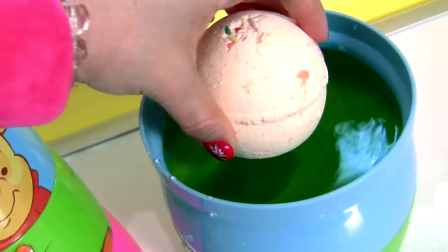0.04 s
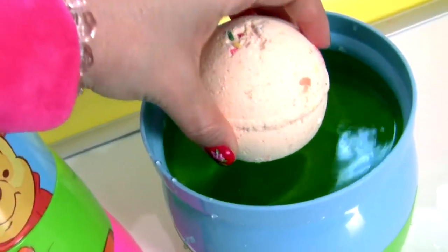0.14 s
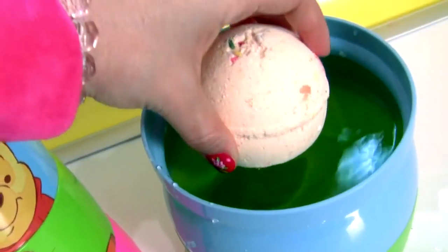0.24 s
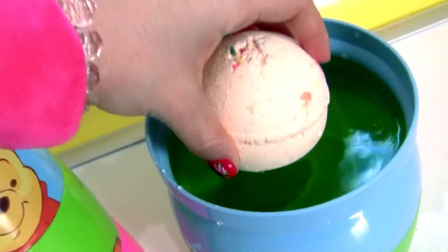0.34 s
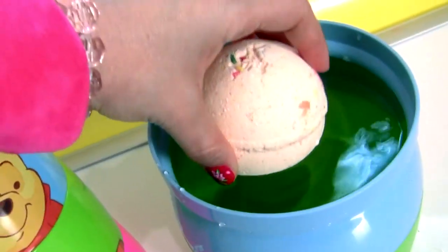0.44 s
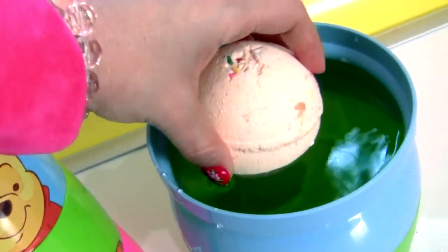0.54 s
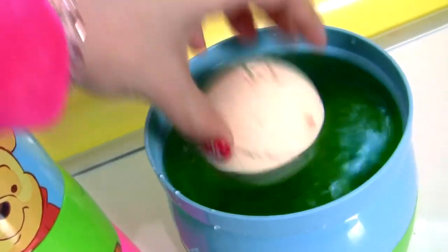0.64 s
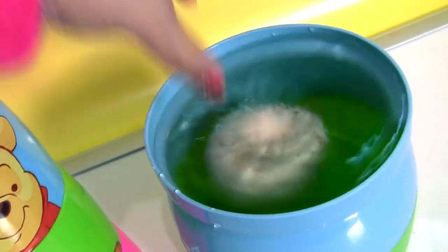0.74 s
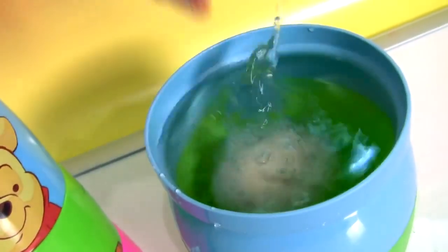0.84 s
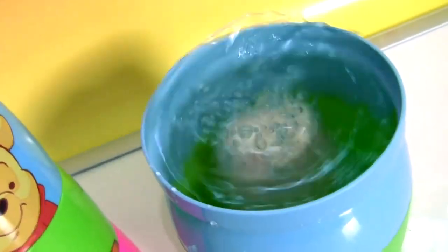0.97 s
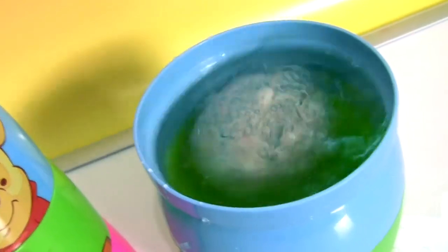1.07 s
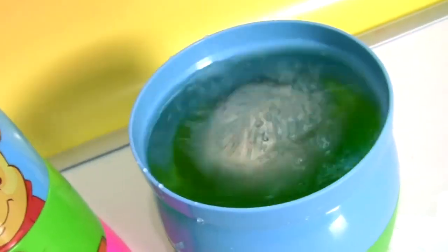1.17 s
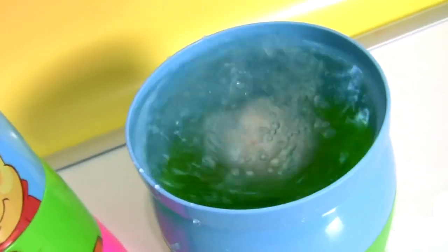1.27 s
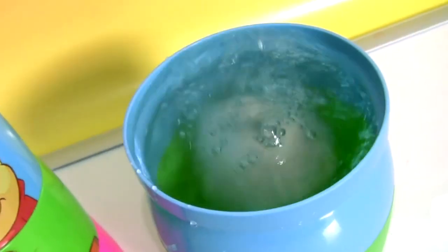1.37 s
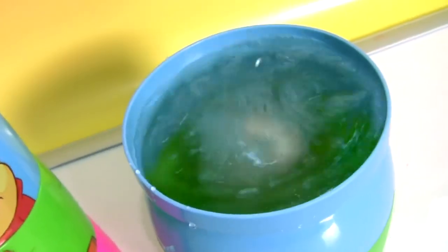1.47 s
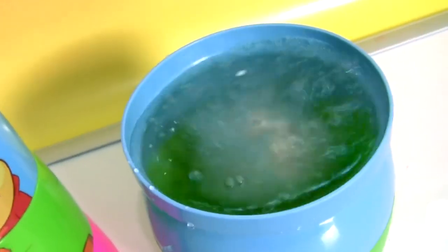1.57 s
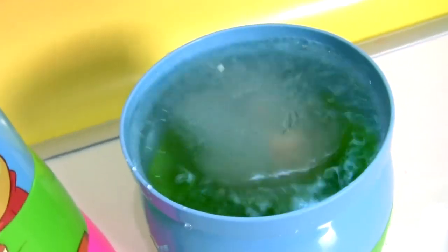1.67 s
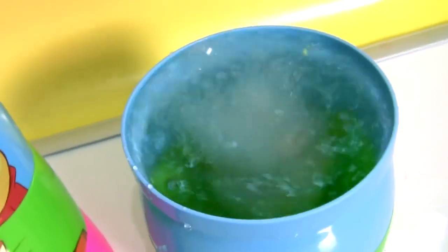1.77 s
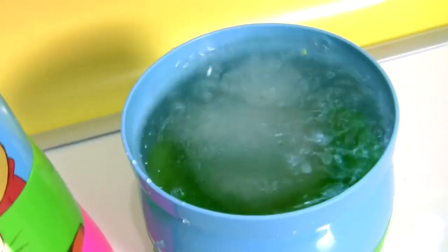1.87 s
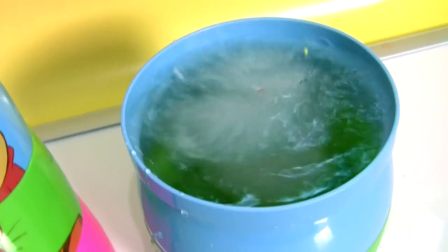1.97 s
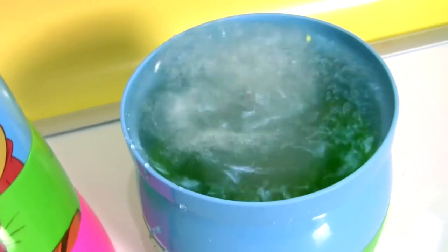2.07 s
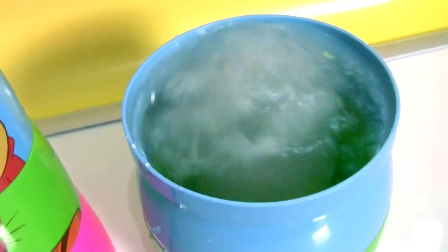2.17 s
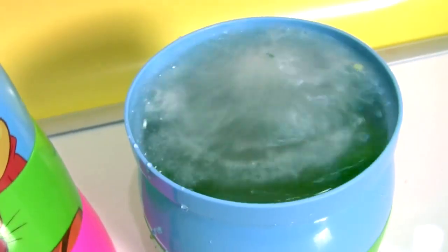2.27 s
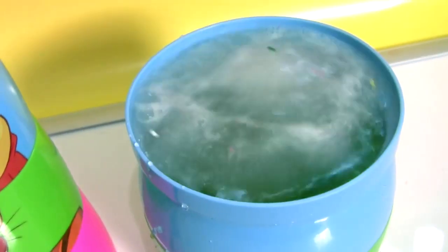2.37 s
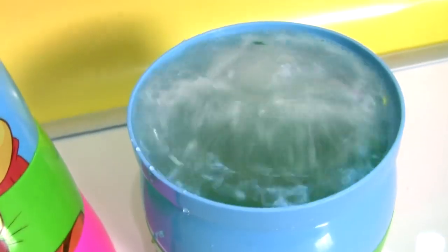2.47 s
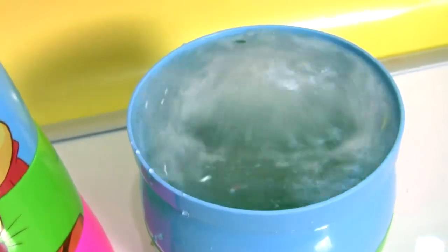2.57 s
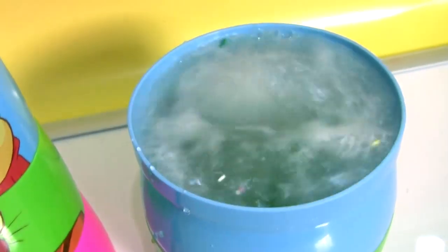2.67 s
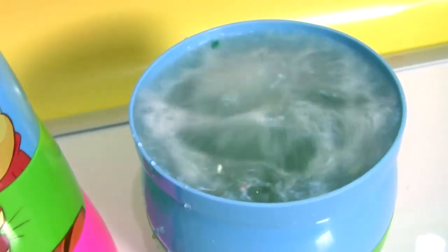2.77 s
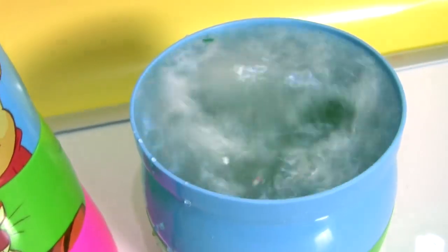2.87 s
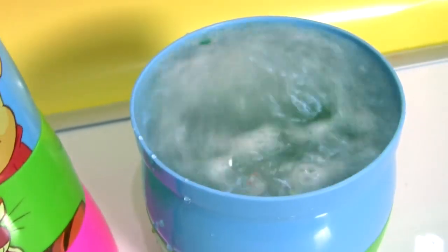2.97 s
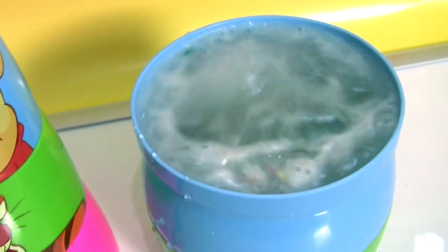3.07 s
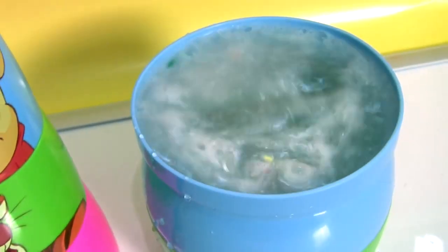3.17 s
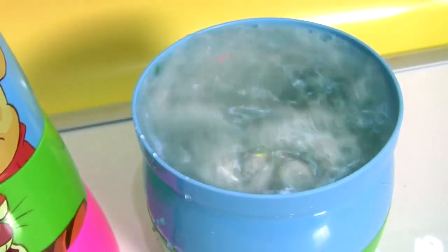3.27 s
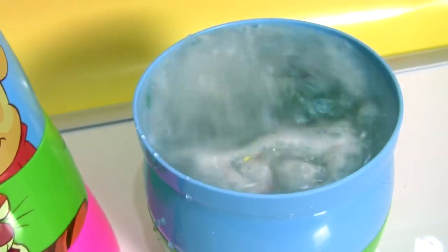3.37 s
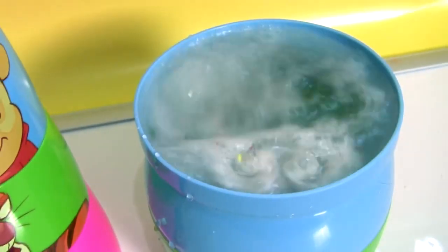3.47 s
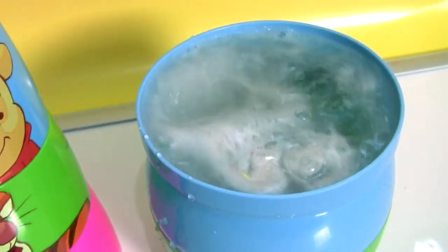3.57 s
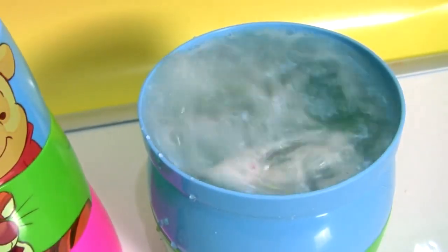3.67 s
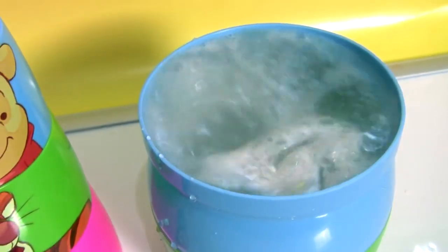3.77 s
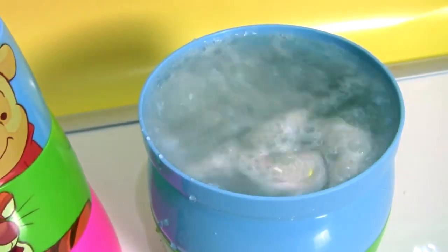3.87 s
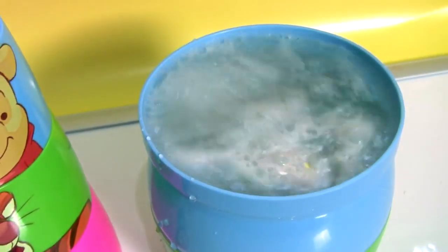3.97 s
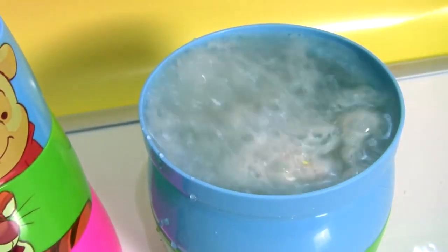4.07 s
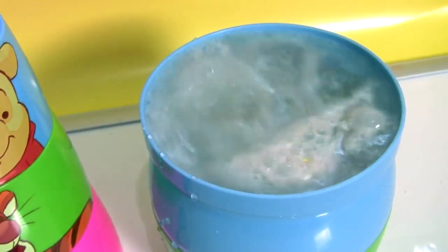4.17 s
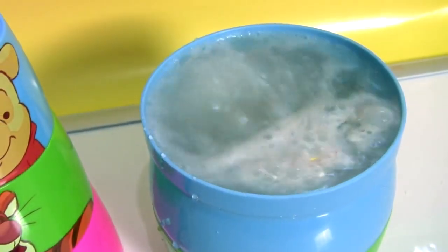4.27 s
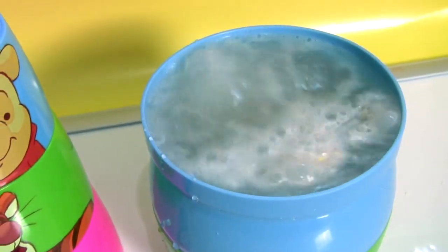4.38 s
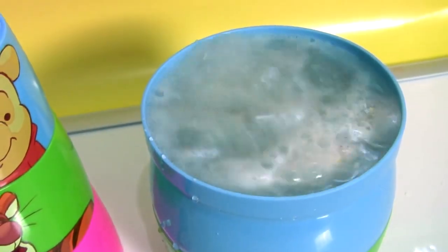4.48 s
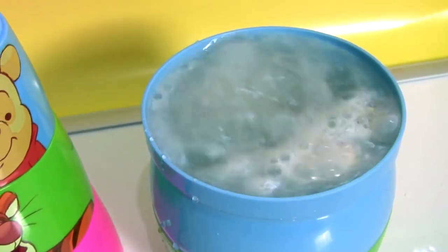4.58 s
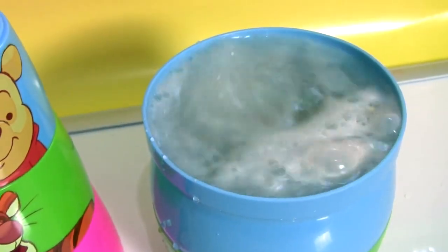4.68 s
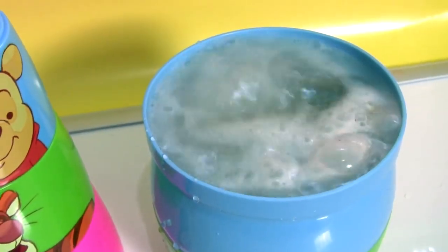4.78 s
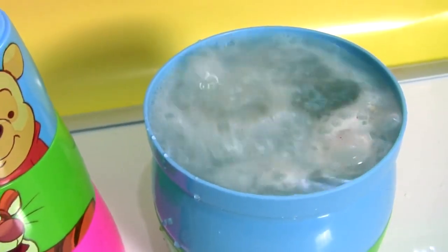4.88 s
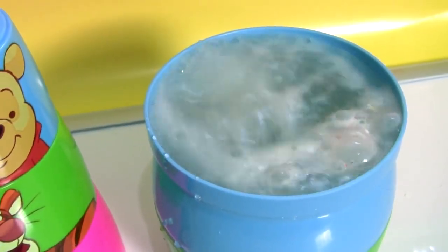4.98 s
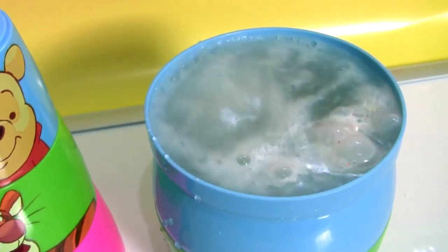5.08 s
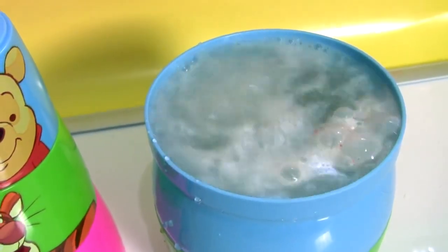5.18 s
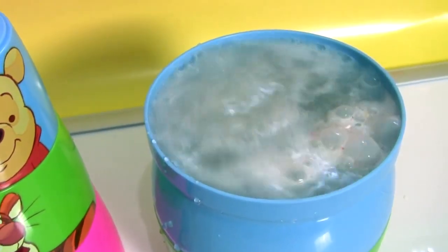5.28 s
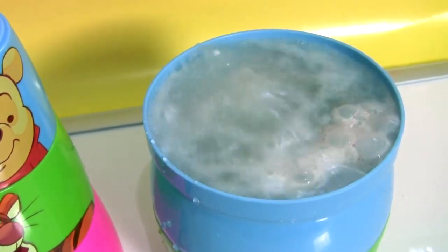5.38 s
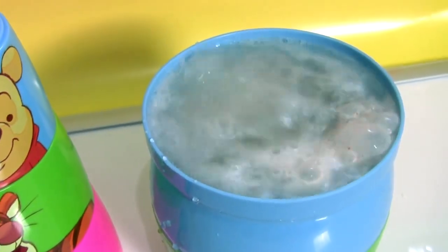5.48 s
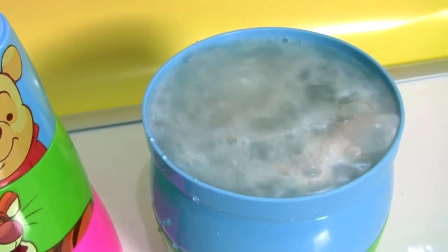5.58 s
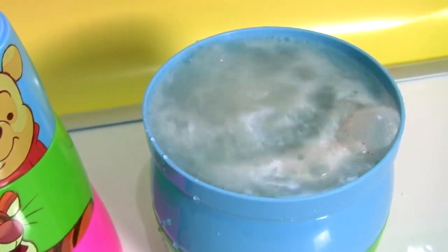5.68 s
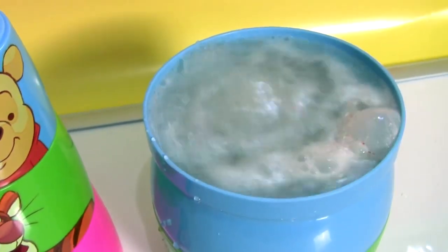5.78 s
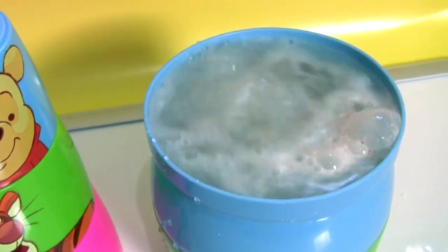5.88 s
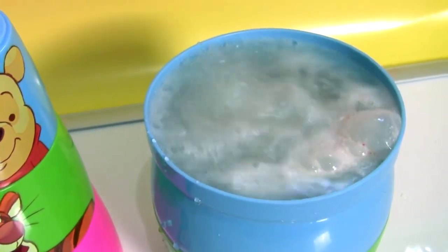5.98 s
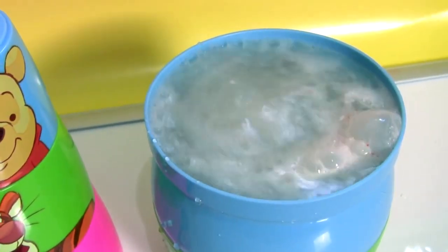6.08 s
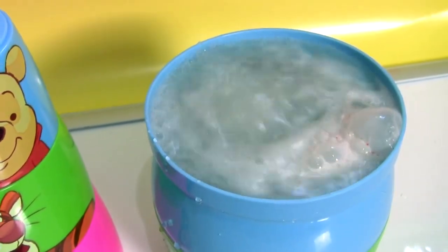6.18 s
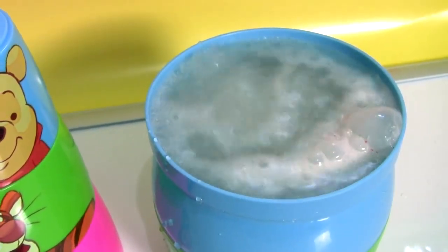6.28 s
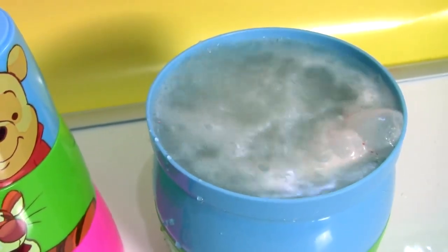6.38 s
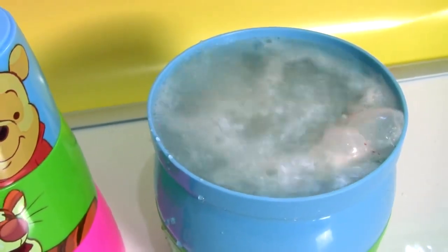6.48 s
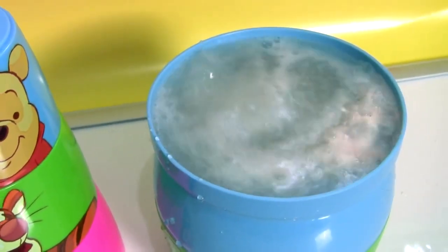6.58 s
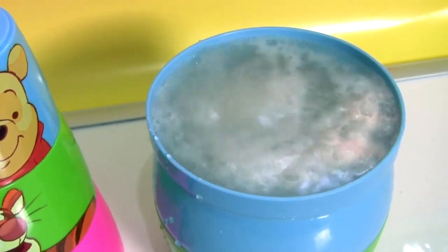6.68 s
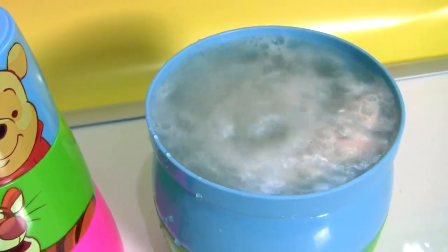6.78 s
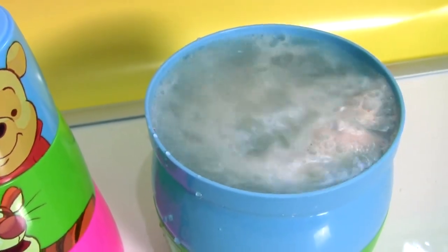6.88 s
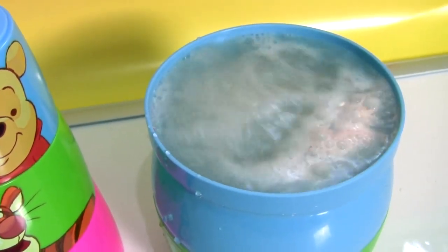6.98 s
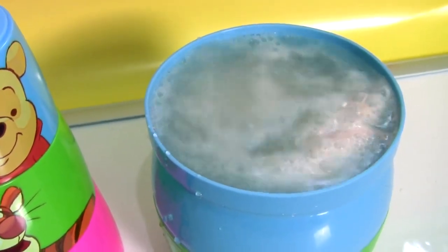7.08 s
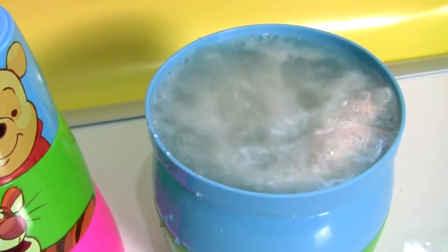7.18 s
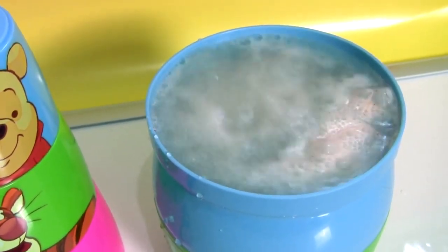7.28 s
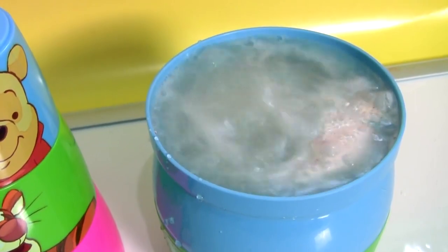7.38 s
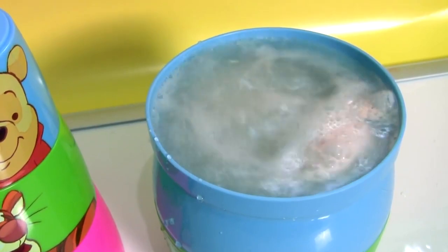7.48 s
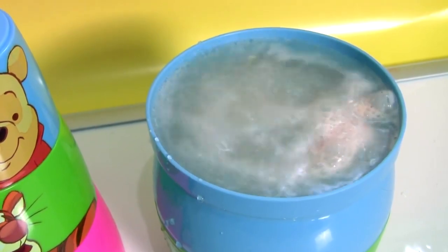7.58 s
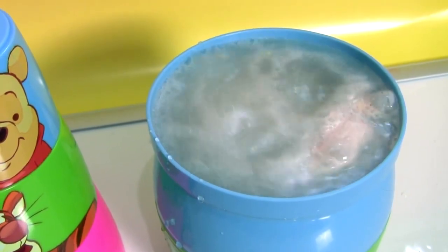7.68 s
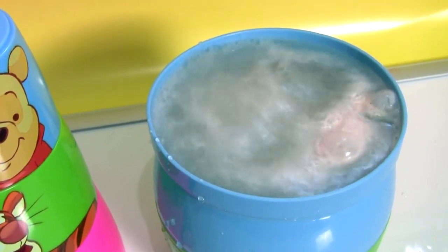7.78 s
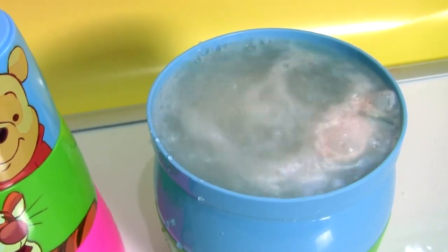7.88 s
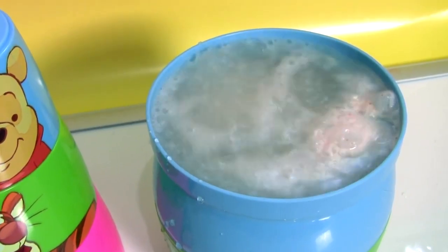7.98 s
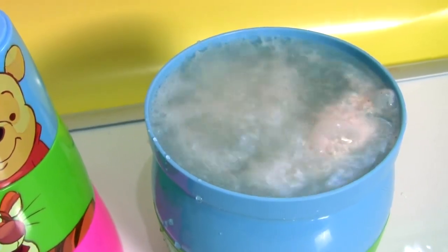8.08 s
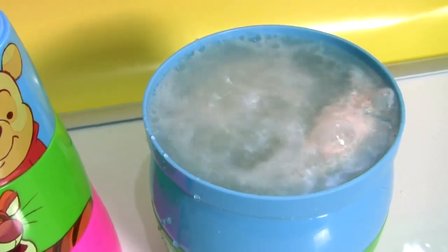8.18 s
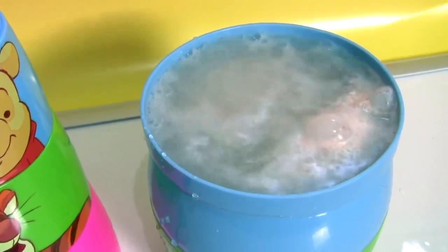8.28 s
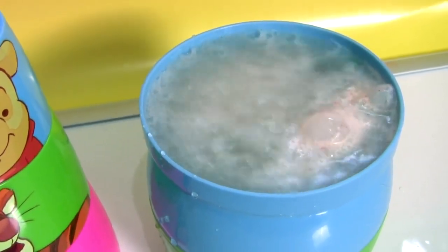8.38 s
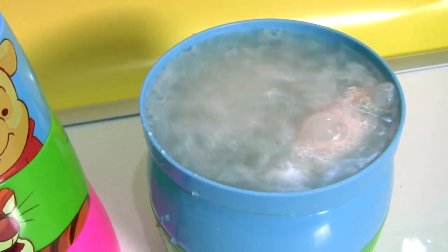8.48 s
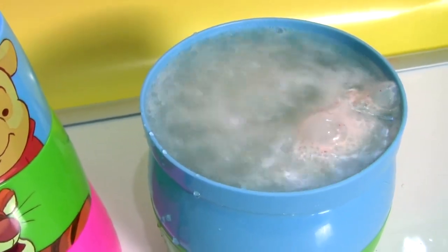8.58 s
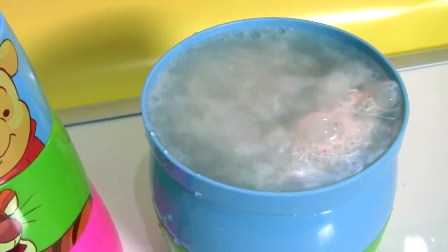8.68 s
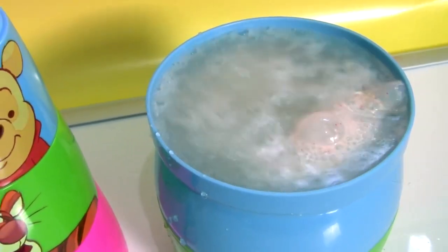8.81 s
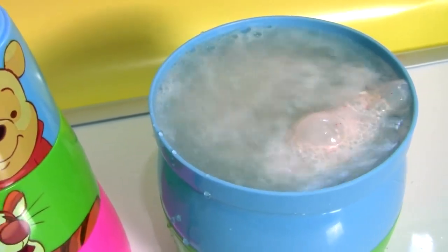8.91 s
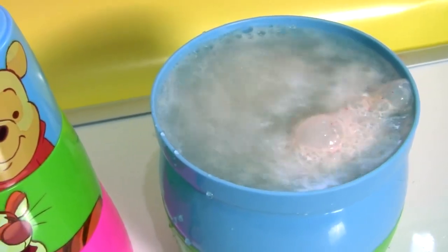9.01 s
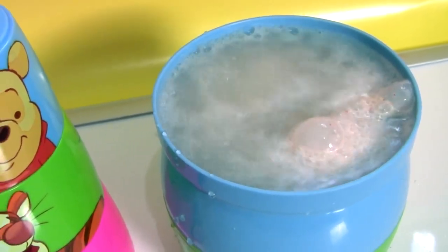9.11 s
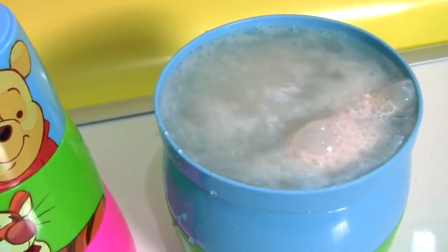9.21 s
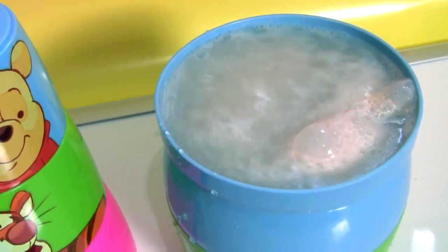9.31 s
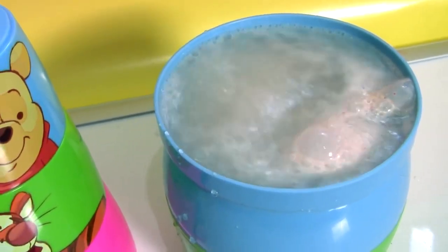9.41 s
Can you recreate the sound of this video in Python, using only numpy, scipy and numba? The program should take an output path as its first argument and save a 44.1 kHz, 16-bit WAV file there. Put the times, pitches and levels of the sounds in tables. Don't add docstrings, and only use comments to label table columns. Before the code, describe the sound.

A bath bomb is dropped into a plastic cup of water at arm's length in a small room with a droning fan. The splash and hard plastic thunk come almost together, followed by bubbling gurgles, crisp spray ticks and a couple of weak bumps. Within about two seconds the crackling thickens into an even, sizzling hiss, slightly right of centre, dotted with plops.

```python
import sys
import numpy as np
from scipy import signal
from scipy.fft import rfft, irfft, next_fast_len
from scipy.io import wavfile
from scipy.ndimage import uniform_filter1d, map_coordinates
from numba import njit

SR = 44100
rng = np.random.default_rng(int(sys.argv[2]) if len(sys.argv) > 2 else 0)


def linear_from_db(decibels):
    return 10 ** (np.asarray(decibels, float) / 20)


def materialize(psi):
    bounded = np.clip(np.atleast_2d(psi).T, -1, 1)
    quanta = np.round(bounded * 32767).astype(np.int16)
    wavfile.write(sys.argv[1], SR, quanta)


N = 416744
OPPOSITE = np.array([[1], [-1]])


def level(x, db):
    return x * linear_from_db(db) / np.sqrt(np.mean(x ** 2))


def curve(table, hold=False):
    s, db = np.transpose(table)
    return np.interp(np.arange(N) / SR, s, db, -120, db[-1] if hold else -120)


def colour(x, points, modes=(), lift_db=0.):
    size = next_fast_len(N)
    hz = np.arange(1, size // 2 + 2) * SR / size
    f, db = np.transpose(points)
    gain = linear_from_db(np.interp(np.log(hz), np.log(f), db))
    for centre, width, top_db in modes:
        gain = gain * (1 + linear_from_db(top_db + lift_db) / (1 + (2 * (hz - centre) / width) ** 2))
    return irfft(rfft(x, size) * gain, size)[..., :N]


def walk(rate):
    k = int(SR / rate)
    steps = np.repeat(rng.standard_normal(N // k + 1), k)
    return 1.4 * uniform_filter1d(uniform_filter1d(steps, k), k)[:N]


@njit
def ring(s, hz, cycles, rise, left, right):
    out = np.zeros((2, N))
    for k in range(len(s)):
        phase, i = 0., int(s[k] * SR)
        step = hz[k] / SR
        while phase < cycles[k] and i < N and step < .45:
            age = phase / cycles[k]
            v = min(20 * age, 1.) * np.exp(-np.log(1000) * age) * np.sin(2 * np.pi * phase)
            out[0, i] += left[k] * v
            out[1, i] += right[k] * v
            phase += step
            step *= 1 + rise[k] * step
            i += 1
    return out


def bubbles(count, low_hz, high_hz, cycles, rise, scatter_db, spread, clump_db=0.):
    when, pitch, strength, place = rng.random((count, 4)).T
    hz = low_hz * (high_hz / low_hz) ** pitch
    clumps = map_coordinates(rng.standard_normal((70, 16)), (69 * when, 15 * pitch), order=1)
    size = linear_from_db(clump_db * clumps - scatter_db * np.log(1 - strength)) * np.sqrt(hz)
    angle = np.pi / 4 + spread * (0.46 + .5 * pitch) * (2 * place - 1)
    return ring(when * N / SR, hz, cycles + 0 * hz, rise + 0 * hz, size * np.cos(angle), size * np.sin(angle))


# pitch_hz, level_db (per Hz)
FAN_COLOUR = [(15, -50), (25, -9), (75, -8.5), (115, -3.5), (237, -7.5), (301, -2.5), (404, -9),
              (655, -5.5), (769, -8.5), (927, -11), (1540, -13.5), (1810, -18.5), (1960, -16),
              (2240, -20.5), (15000, -37)]
# pitch_hz, width_hz, level_db
DUCT_MODES = [(296.2, 18, -1.5), (768, 13, 2), (1316, 16, -5.5), (1556, 36, -5.5), (2610, 50, -2)]
# time_s, level_db
FAN_LOUDNESS = [(0, -62), (.9, -62), (2.5, -61.5), (5, -62), (9.45, -61)]


def fan():
    mid, side = colour(rng.standard_normal((2, N)), FAN_COLOUR, DUCT_MODES, lift_db=6.0)
    air = level(mid, 0) * linear_from_db(0.099 * walk(2.9))
    air = air + level(side, 2.3) * linear_from_db(2.3 * walk(3.97)) * OPPOSITE
    return air * linear_from_db(curve(FAN_LOUDNESS, hold=True))


# pitch_hz, level_db
HUM_TONES = [(59.6, -78), (118.5, -88), (738, -77.5), (1529, -81.5)]


def hum():
    t = np.arange(N) / SR
    out = np.zeros(N)
    for hz, db in HUM_TONES:
        loudness = linear_from_db(db + 0.27 * t + 0.5 * walk(3.1))
        out += np.sqrt(2) * loudness * np.sin(2 * np.pi * hz * t)
    return out


BASS_PAN = linear_from_db(-3 * np.array([[.5], [-.5]]))


def rumble():
    deep = signal.lfilter(*signal.butter(3, 32, fs=SR), rng.standard_normal((2, N)))
    return BASS_PAN * level(deep, -78)


# time_s, level_db
SLIP_LEVEL = [
    (0.6, -94),
    (0.666, -60),
    (0.698, -63.5),
    (0.714, -88),
    (0.74, -84),
]


def slip():
    grit = bubbles(count=70000, low_hz=1900, high_hz=13500, cycles=2.9, rise=0., scatter_db=0.5, spread=0.77)
    return level(grit, .3) * linear_from_db(curve(SLIP_LEVEL))


# late_ms, peak_db, pitch_hz, ring_cycles
SLAP_RINGS = [(0, -22.5, 1390, 5.1), (.4, -30, 3700, 11), (.5, -25.5, 7800, 10), (1.6, -23.5, 2600, 3),
              (3.5, -33, 910, 4.9), (8, -50, 9200, 14)]


def slap():
    late_ms, db, hz, cycles = np.transpose(SLAP_RINGS)
    return ring(.8495 + late_ms / 1000, hz, cycles, 0 * hz, linear_from_db(db), linear_from_db(db))


# time_s, level_db
GURGLE_LEVEL = [(0.86, -63), (0.92, -70), (1.04, -45), (1.12, -53), (1.4, -58), (1.6, -54.5), (2.32, -62),
                (3.34, -64), (4.2, -64.5)]


def gurgle():
    crowd = bubbles(count=30000, low_hz=220, high_hz=2400, cycles=14., rise=.008, scatter_db=1.4,
                    spread=.4, clump_db=1.5)
    shape = [(200, -0.5), (450, 0.5), (560, 4.0), (740, 3.0), (900, 2.0), (1300, 1.5), (1700, -6), (2600, -5.0)]
    wash = colour(crowd, shape, [(748, 76, 3.0), (518, 63, -4)])
    return level(wash, -1.75) * linear_from_db(curve(GURGLE_LEVEL, hold=True))


def slosh():
    low = signal.lfilter(*signal.butter(2, (54.8, 109.6), "band", fs=SR), rng.standard_normal(N))
    return BASS_PAN * level(low, -15.5) * linear_from_db(curve(GURGLE_LEVEL, hold=True))


# start_s, peak_db, pitch_hz, ring_cycles
RINGING_BUBBLES = [(0.8656, -38, 2800, 56), (1.254, -43.5, 6230, 110), (1.333, -53, 2640, 59),
                   (1.378, -50, 735, 30), (1.431, -44, 1300, 33), (1.965, -43.5, 1530, 78),
                   (1.963, -48, 2000, 70), (1.966, -49, 3190, 80), (2.365, -42, 2450, 53),
                   (3.14, -41, 3080, 55)]


def ringing_bubbles():
    s, db, hz, cycles = np.transpose(RINGING_BUBBLES)
    return ring(s, hz, cycles, 0 * s, linear_from_db(db), linear_from_db(db))


# start_s, strength_db, contact_ms, crack_db
POT_BLOWS = [(0.9435, -10, 0.66, -26.5), (.9472, -14.5, 0.18, -34), (0.9514, -6.5, 2.44, -50),
             (0.954, -2.5, 0.55, -26), (0.9564, -11, 1.85, -58), (1.17, -35, 3.6, -48.5),
             (1.4847, -36, 0.79, -37), (1.496, -30.5, 0.92, -48), (1.84, -35, 1.5, -57),
             (1.85, -47, 2.9, -69)]
# pitch_hz, level_db, fade_s (time to fall 60 dB)
POT_MODES = [(108, -28, 0.29), (146.5, -10.5, 0.27), (208, -24, 0.142), (239.3, -10.5, 0.26),
             (327, 0.5, 0.035), (420, -27, 0.051), (521, 5.5, 0.035), (578, -4, 0.019), (680, -2.5, 0.021),
             (752, 3, 0.019), (990, -5, 0.012), (1130, -5.5, 0.02), (1300, 1, 0.011), (1477, -3, 0.021),
             (1980, -3.5, 0.015)]


def knocks():
    hz, db, t60 = np.transpose(POT_MODES)
    out, t = np.zeros(N), np.arange(SR // 2) / SR
    for s, blow_db, contact_ms, crack_db in POT_BLOWS:
        share = linear_from_db(db + 1.5 * rng.standard_normal(len(hz)))[:, None]
        modes = np.sin(2 * np.pi * hz[:, None] * t) * 1000. ** (-t / t60[:, None])
        body = np.sum(share * modes, axis=0)
        push = np.sin(np.pi * np.clip(t[:300] / (contact_ms / 1000), 0, 1))
        body = np.convolve(body, push / push.sum())[:len(t)]
        crack = signal.lfilter(*signal.butter(2, (1500, 4500), "band", fs=SR), rng.standard_normal(len(t)))
        crack = crack * 1000. ** (-t / 0.02)
        i = int(s * SR)
        out[i:i + len(t)] += linear_from_db(blow_db - 11.0) * body + linear_from_db(crack_db + 6.5) * crack
    out = signal.lfilter(*signal.butter(3, 170, "high", fs=SR), out)
    return np.array([out, out])


# time_s, level_db (of the middle-sized bursts)
GAS_LEVEL = [(1.0, -71), (1.1, -89), (1.33, -69), (1.6, -68.5), (2.0, -68.5), (2.1, -62.5), (2.3, -60),
             (2.4, -57), (3.4, -55), (4.1, -56.5), (5.3, -56), (5.6, -55), (6.0, -55), (6.5, -54.5),
             (6.8, -54.5), (7.7, -54), (8.1, -53.5), (9.35, -54)]


def burst_sizes():
    steady_db, scarce_span_db = -55.5, 12
    heave_s, heave_width_s, heave_db = 4.37, 0.44, 5
    t, gas = np.arange(N) / SR, curve(GAS_LEVEL, hold=True)
    scarce = np.clip((steady_db - gas) / scarce_span_db, 0, 1)
    large = -64.5 + np.minimum(gas - steady_db, 0) - 0.11 * t
    large = large + heave_db * np.exp(-((t - heave_s) / heave_width_s) ** 2)
    first_s = GAS_LEVEL[0][0]
    spray = np.where(t > first_s, -68.5 - 17 * (t - first_s), -120)
    large = 10 * np.log10(linear_from_db(large) ** 2 + linear_from_db(spray) ** 2)
    fine = gas - 8.5 + 8.5 * scarce + .5 * t
    return (large, gas, fine), scarce


# pitch_hz, level_db (per Hz)
FIZZ_TONE = [(1000, -48), (1700, -12.5), (2080, -16.5), (2990, -6), (3340, -6), (4170, -1.5), (5110, -2),
             (5980, 0.5), (7000, -1.5), (7600, 0.5), (8500, -3), (9760, 0), (11500, -3.5), (13500, 3),
             (15500, 2.5)]


def fizz():
    sizes_db, scarce = burst_sizes()
    crowd = bubbles(count=100000, low_hz=1500, high_hz=17000, cycles=28., rise=.005, scatter_db=1.9,
                    spread=.85, clump_db=1.7)
    mid, side = rng.standard_normal((2, N))
    smooth = level(mid + .47 * side * OPPOSITE, -2)
    crowd = level(crowd, -3) + (1 - .5 * scarce) * smooth
    crackle = bubbles(count=3000, low_hz=4000, high_hz=16000, cycles=3.8, rise=0., scatter_db=1.5, spread=1.0)
    crowd = level(crowd, 0) + level(crackle, -5.5) * (.07 + scarce ** 2)
    crowd = colour(crowd, FIZZ_TONE)
    large = signal.sosfiltfilt(signal.butter(3, 3500, fs=SR, output="sos"), crowd)
    up_to_middle = signal.sosfiltfilt(signal.butter(3, 10500, fs=SR, output="sos"), crowd)
    parts = (large, up_to_middle - large, crowd - up_to_middle)
    shared = .25 * walk(10) + (.3 + 1.5 * scarce) * walk(60)
    out = np.zeros((2, N))
    for part, db in zip(parts, sizes_db):
        out += level(part, 0.52) * linear_from_db(db + shared + .5 * walk(12))
    return out


# start_s, peak_db, pitch_hz
SPRAY_TICKS = [(1.007, -43, 6400), (1.0234, -48, 14400), (1.0274, -52, 6670), (1.0955, -40.5, 9800),
               (1.1287, -49, 4320), (1.149, -46, 9310), (1.1684, -48, 4100), (1.2464, -53, 4000),
               (1.2545, -41, 6060), (1.2875, -48, 4040), (1.3246, -45, 10300), (1.3505, -38, 8200),
               (1.385, -44, 4590), (1.4272, -49, 4480), (1.4611, -48, 9610), (1.477, -45, 6300),
               (1.5104, -46, 5940), (1.5708, -44, 9940), (1.5946, -40, 8160), (1.6167, -47, 5800),
               (1.6367, -41.5, 6270), (1.6564, -44, 10200), (1.694, -40, 8970), (1.7185, -38, 8360),
               (1.7598, -41, 6200), (1.8696, -46, 9870), (1.9445, -52, 6120), (2.0695, -44, 4140),
               (2.0862, -44, 5240), (2.4654, -40, 4130)]


def spray_ticks():
    when, size, high = rng.random((44, 3)).T
    strays = [1.2 + 1.1 * when, -49.5 + 3.5 * (2 * size - 1), 4000 * 3.5 ** high]
    s, db, hz = np.concatenate([np.transpose(SPRAY_TICKS), strays], axis=1)
    chance = rng.random((len(s), 11)).T
    side = linear_from_db(2.5 * (chance[0] - 1.5))
    out = ring(s, hz, 28.0 + 0 * s, 0 * s, linear_from_db(db - 2.0) * side, linear_from_db(db - 4.5) / side)
    size = linear_from_db(db - 5.5)
    for late, high in zip(chance[1:6], chance[6:]):
        finer_hz = 6000 + 10500 * high
        out = out + ring(s + 0.00075 * late, finer_hz, 18.0 + 0 * s, 0 * s, size * side, size / side)
    return out


# start_s, peak_db, pitch_hz
AIR_GULPS = [
    (1.172, -40, 273),
    (1.487, -30, 198),
    (1.498, -33, 286),
    (1.845, -46, 236),
]


def gulps():
    s, db, hz = np.transpose(AIR_GULPS)
    return ring(s, hz, 16.8 + 0 * s, -0.011 + 0 * s, linear_from_db(db), linear_from_db(db))


# start_s, peak_db, pitch_hz
BUBBLE_POPS = [(1.232, -52, 3480), (1.353, -55, 3570), (1.485, -36, 2080), (1.486, -39, 3200),
               (1.729, -51, 3900), (1.79, -52, 4600), (1.813, -42.5, 1300), (1.815, -43, 2560),
               (1.838, -41.5, 675), (2.07, -53, 3900), (2.099, -49, 3000), (2.146, -49, 2350),
               (2.165, -44.5, 3900), (2.209, -41.5, 660), (2.639, -46, 660), (4.235, -46, 2910),
               (4.5223, -44.5, 1900), (4.559, -35.5, 4750), (4.558, -37.5, 6000), (4.558, -42, 7660),
               (5.622, -47, 2200), (5.759, -47, 2790), (6.471, -51, 710), (6.8139, -40, 765),
               (7.213, -49, 735), (7.264, -47, 2570), (7.287, -47, 2940), (7.885, -50, 680),
               (8.758, -44, 2580)]


def pops():
    s, db, hz = np.transpose(BUBBLE_POPS)
    return ring(s, hz, 8 + hz / 160, 0 * s, linear_from_db(db + 1.0), linear_from_db(db + 3.5))


# start_s, peak_db, pitch_hz, ring_cycles
RISING_BUBBLES = [(1.258, -53.5, 1950, 190), (1.268, -47, 1100, 60), (1.284, -50, 1150, 60),
                  (1.293, -51, 1280, 60), (1.312, -56, 2260, 170), (1.368, -55.5, 2300, 190),
                  (1.545, -52, 1270, 60)]


def rising_bubbles():
    climb = 1.3
    s, db, hz, cycles = np.transpose(RISING_BUBBLES)
    out = ring(s, hz, cycles, climb / cycles, linear_from_db(db), linear_from_db(db))
    for late, pitch in rng.random((len(s), 2, 2)).T:
        near_hz = hz * (1 + 0.1 * pitch)
        out = out + ring(s + .012 * late, near_hz, cycles * .7, climb / cycles, linear_from_db(db - 1), linear_from_db(db))
    return out


# time_s, level_db
SPIT_LEVEL = [
    (1.95, -88),
    (1.957, -57),
    (1.978, -55),
    (1.995, -83),
]


def spit():
    froth = bubbles(count=20000, low_hz=1150, high_hz=4200, cycles=16., rise=.004, scatter_db=1.3, spread=.6)
    return level(froth, .3) * linear_from_db(curve(SPIT_LEVEL))


def room(x):
    t60_s, width = 0.31, 0.29
    t = np.arange(SR // 2) / SR
    mid, side = rng.standard_normal((2, len(t))) * 1000. ** (-t / t60_s) * (t > .004)
    tail = signal.lfilter(*signal.butter(1, 2500, fs=SR), mid + width * side * OPPOSITE)
    tail = tail / np.sqrt(np.sum(tail ** 2))
    return signal.fftconvolve(x.mean(axis=0)[None], tail, axes=1)[:, :N]


def scene():
    pot = slip() + slap() + gurgle() + ringing_bubbles() + knocks() + fizz()
    pot = pot + spray_ticks() + gulps() + pops() + rising_bubbles() + spit()
    pan = linear_from_db(-2.5 * OPPOSITE / 2)
    return pot * pan + linear_from_db(-16.5) * room(pot) + fan() + hum() + rumble() + slosh()


def top_cut(x):
    return signal.sosfilt(signal.butter(12, 16620, fs=SR, output="sos"), x)


def record(dry):
    ceiling, top_hz = .55, 15800
    hiss = signal.lfilter(*signal.butter(2, 5000, fs=SR), rng.standard_normal(dry.shape))
    dry = dry + linear_from_db(-75.5) * hiss
    x = dry / (1 + np.abs(dry / ceiling) ** 6) ** (1 / 6)
    x = signal.sosfilt(signal.ellip(10, .2, 60, top_hz, fs=SR, output="sos"), x)
    return top_cut(x)


dry = scene()
out = record(dry)
materialize(out)
```